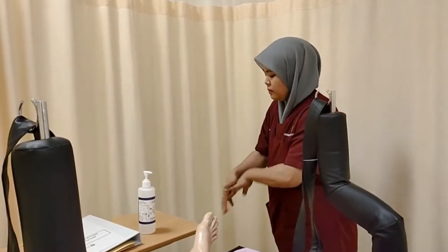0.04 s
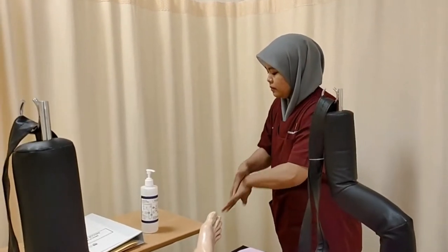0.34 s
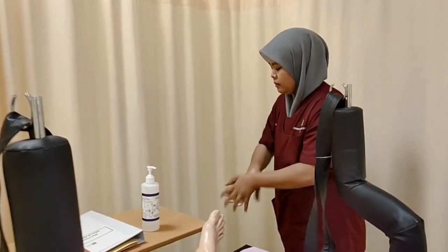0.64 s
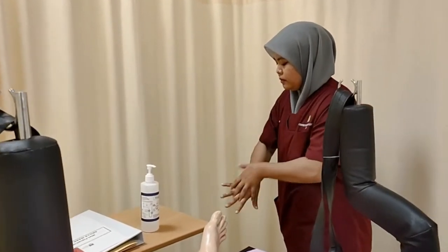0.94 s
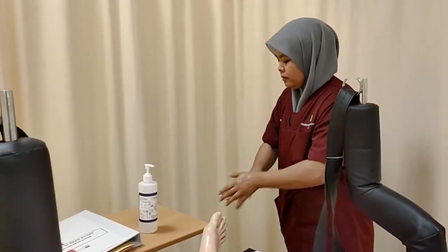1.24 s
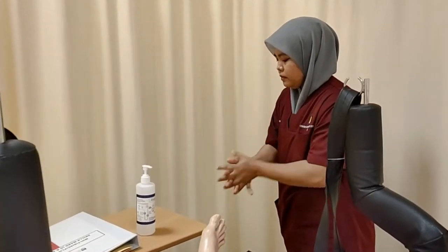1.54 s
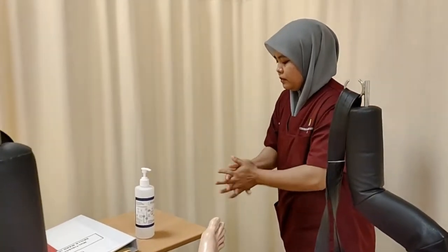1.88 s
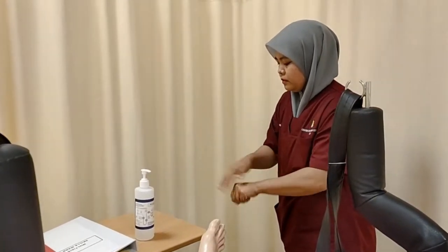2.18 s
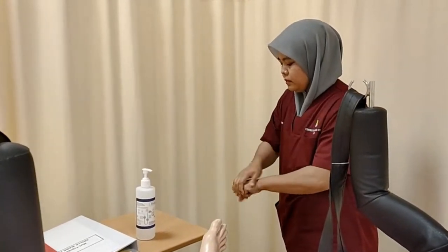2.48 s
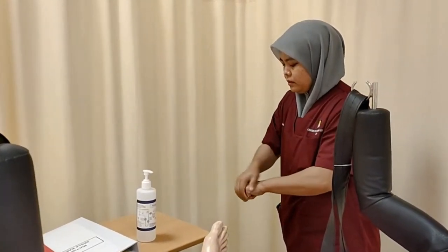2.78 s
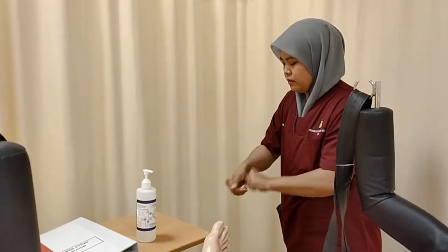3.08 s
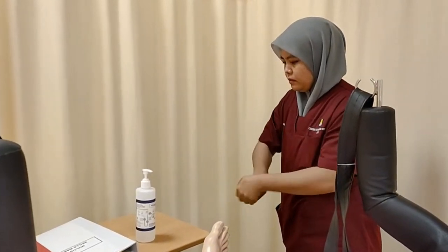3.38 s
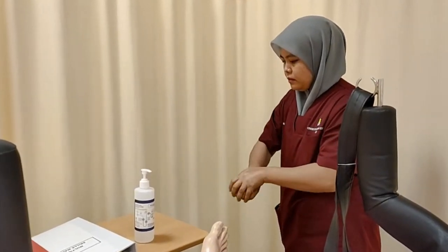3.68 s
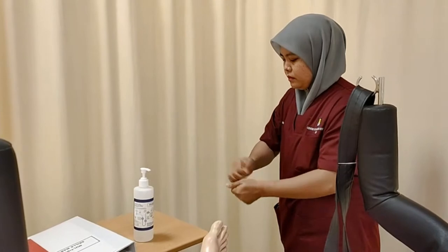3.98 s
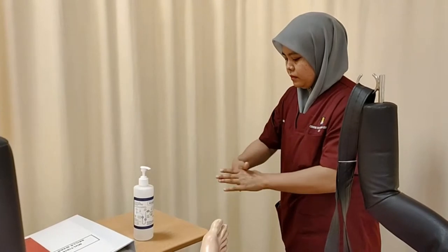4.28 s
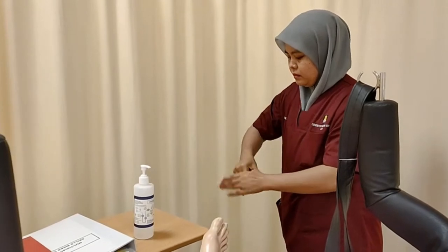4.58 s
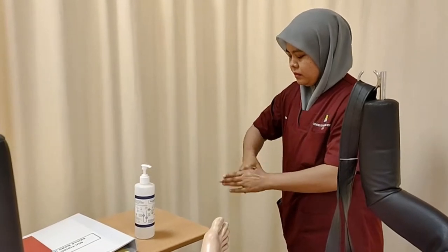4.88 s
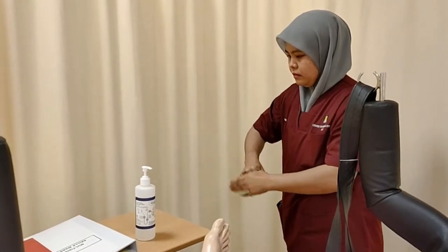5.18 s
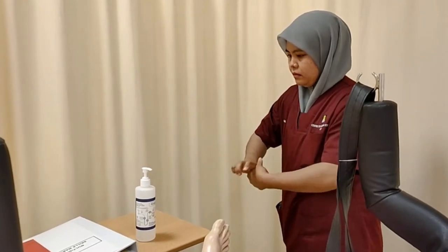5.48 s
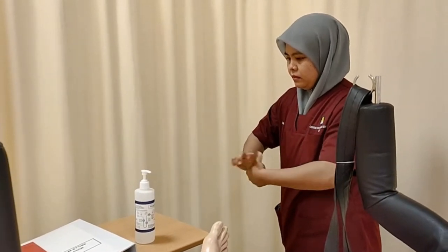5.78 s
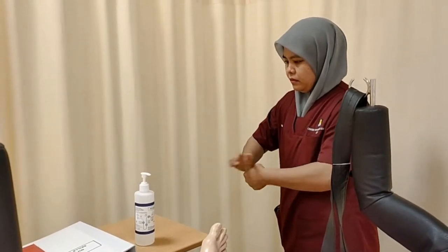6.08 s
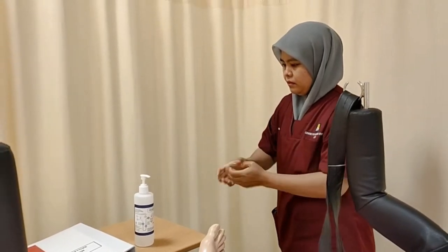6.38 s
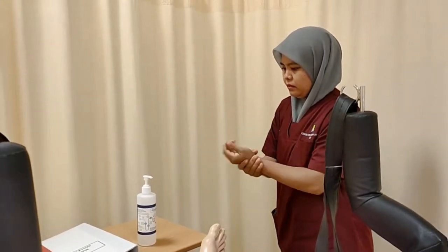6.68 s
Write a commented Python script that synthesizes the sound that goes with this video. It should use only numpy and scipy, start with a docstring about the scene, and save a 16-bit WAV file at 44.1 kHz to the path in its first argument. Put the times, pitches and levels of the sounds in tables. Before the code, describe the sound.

Quiet hand rubbing is heard in stereo in a small room with little echo. Brisk, hissy palm strokes come first, followed by softer, uneven rubbing and occasional tiny clicks of damp skin, one sharper near the middle. After a brief lull, a few more light strokes follow. A low ventilation rumble, a wavering hum and a thin hiss continue throughout, stronger than the hands.

```python
"""Hands rub together in a curtained room: brisk palm strokes first, softer wringing later.
Each stroke of skin on skin is a swell of tiny slips. Cupped palms squeeze out one puff of air,
and now and then damp skin parts with a tick. Air conditioning rumbles and hums throughout,
its vent hissing from the right, under a faint high hiss. Heard at two microphone ports."""
import sys
import numpy as np
from scipy import signal
from scipy.fft import rfft, irfft
from scipy.io import wavfile

SR = 44100
rng = np.random.default_rng(int(sys.argv[2]) if len(sys.argv) > 2 else 0)


def wrap_up_sound(samples):
    """Save the sound to the file named by the first command line argument, as 16-bit audio."""
    columns = np.atleast_2d(samples).T
    # keep every value between -1 and 1, then stretch to whole-number steps
    tamed = np.clip(columns, -1, 1)
    steps = np.round(tamed * 32767).astype(np.int16)
    wavfile.write(sys.argv[1], SR, steps)


N = 301551
TIME_S = np.arange(N) / SR
FREQ_HZ = np.maximum(np.arange(N // 2 + 1) * SR / N, 1)

# ventilation rumble: freq_hz, density_db_per_hz
RUMBLE_SPECTRUM = [(4, -72), (13, -44), (21, -49), (30, -47), (46, -55), (64, -58), (120, -58), (155, -65),
                   (230, -65.5), (370, -71), (520, -74.5), (850, -78.5), (1400, -81.5), (2200, -83.5),
                   (2650, -91.5), (4500, -112)]
# duct and room resonances: centre_hz, width_hz, lift_db
DUCT_MODES = [(49.7, 4.2, 7.5), (97.5, 4.7, -1), (140.8, 1.16, 7.5), (187.5, 24.7, 5.5), (274.3, 5.4, 2.5),
              (299.3, 14, 4), (438.3, 10.5, 4.5), (675, 61, 4.5), (791, 30, 7), (881, 13.5, 8),
              (1038, 6.7, 5.5)]
# direct vent hiss: freq_hz, density_db_per_hz
VENT_SPECTRUM = [(500, -100), (1000, -90), (1350, -88), (1800, -86.5), (2250, -83.5), (2450, -96),
                 (3000, -112)]
# blower hum, with brief dips and a late swell: time_s, level_db
HUM_LEVELS = [(0.0, -38.5), (0.6, -45), (0.78, -50), (1.0, -38.5), (1.6, -41.5), (2.1, -39.5), (2.3, -49),
              (2.6, -38.5), (3.1, -39.5), (4.2, -38), (4.9, -38), (5.15, -45.5), (5.65, -35), (6.25, -35.5),
              (6.5, -48.5), (6.84, -38.5)]
# faint high hiss: freq_hz, density_db_per_hz
HISS_SPECTRUM = [(4500, -118), (5400, -109), (6500, -106), (7700, -102), (9000, -106.5), (10200, -114),
                 (11500, -114), (12600, -116), (13200, -145)]
# sliding skin: freq_hz, gain_db
SKIN_SPECTRUM = [(1200, -28), (3200, -1), (4000, -5.5), (4550, -16), (5400, 1.5), (6100, 0.5), (7400, 8),
                 (8500, 4.5), (9600, -1.5), (10500, -8.5), (11700, -10), (13000, -11), (14200, -9),
                 (15500, -21)]
# light rubbing between strokes: time_s, level_db
CONTACT_LEVELS = [(0.0, -66), (0.4, -69), (0.7, -65), (2.3, -73.5), (3.1, -75), (4.3, -67.5), (4.8, -71),
                  (5.2, -69), (6.05, -70), (6.84, -66)]
# hand strokes: centre_s, level_db, half_length_s, brightness_db
HAND_STROKES = [(0.037, -55, 0.023, 4.0), (0.137, -55.5, 0.027, 0.5), (0.25, -55, 0.017, 5),
                (0.507, -57.5, 0.021, 0), (0.592, -55, 0.017, 2), (0.677, -48, 0.013, 1),
                (0.768, -55, 0.026, 2.5), (0.869, -46, 0.012, -3), (0.953, -54, 0.02, 2.5),
                (1.066, -46.5, 0.0087, -2), (1.188, -56, 0.02, 0), (1.262, -60, 0.019, 4),
                (1.328, -55.5, 0.029, 1), (1.415, -52, 0.019, -1), (1.51, -57, 0.02, -2),
                (1.607, -51, 0.015, -1), (1.722, -47, 0.014, -1), (1.807, -50, 0.021, -6),
                (1.933, -46.5, 0.01, -3), (1.995, -62, 0.022, 3), (2.078, -57, 0.011, -2),
                (2.229, -60.5, 0.011, -3), (2.283, -64, 0.015, -1), (2.394, -58.5, 0.016, 0),
                (2.486, -61.0, 0.007, -9), (2.55, -59.5, 0.02, -2), (2.63, -54.5, 0.017, -1),
                (2.742, -59, 0.013, -15), (2.783, -63, 0.017, 0), (2.87, -57.0, 0.031, 0.5),
                (2.936, -63, 0.023, -7), (2.995, -63, 0.018, 0.0), (3.082, -61, 0.022, 0),
                (3.157, -57, 0.0071, 2), (3.184, -54, 0.012, -6), (3.24, -59, 0.063, -1),
                (3.375, -53, 0.015, -3), (3.46, -58.5, 0.023, 0.0), (3.513, -59.5, 0.018, 0),
                (3.596, -53.5, 0.013, -3), (3.684, -63.5, 0.048, 0), (3.81, -60.5, 0.025, 1),
                (3.898, -56, 0.016, -2), (3.948, -63, 0.035, 3), (4.1, -65, 0.023, -1),
                (4.159, -58.5, 0.016, 4.5), (4.325, -62.0, 0.0091, 6), (4.61, -62, 0.034, 1),
                (5.337, -63, 0.01, -1.0), (5.402, -61, 0.04, 3.5), (5.544, -63.5, 0.031, 2),
                (5.631, -62, 0.013, 1), (5.698, -59, 0.018, 3.5), (5.84, -59, 0.016, 3),
                (5.92, -62, 0.032, 2), (6.188, -63, 0.03, 4), (6.27, -66, 0.031, 5),
                (6.404, -63, 0.038, -4), (6.483, -60, 0.035, -1), (6.574, -70, 0.029, -6),
                (6.652, -62, 0.028, 8), (6.71, -57, 0.024, 3), (6.758, -67, 0.021, 3.0),
                (6.82, -55, 0.036, 1)]
# air squeezed from cupped palms: start_s, pitch_hz, dry_peak_db, t60_s
PALM_PUFFS = [(1.422, 1290, -36.5, 0.066)]
# damp skin parting: start_s, dry_peak_db
SKIN_TICKS = [(2.149, -39), (2.3937, -47), (2.4856, -48), (2.6227, -44), (3.158, -39), (3.1692, -25.5),
              (3.66, -43), (6.469, -44)]
# modes of the hollow between the hands: pitch_hz, gain_db, t60_s
HOLLOW_MODES = [(1820, -6.5, .007), (2390, -8, 0.0046), (3550, -12.5, 0.0064), (5990, -1.5, 0.0039),
                (6570, 0.5, 0.005), (7300, -6, .006), (8600, -1.5, 0.0043), (13400, -14, .0015)]
# room field at the two ports: freq_hz, correlation
PORT_CORRELATION = [(40, 0.99), (64, 0.98), (85, 0.88), (130, 0.97), (290, 0.84), (600, 0.65), (800, 0.24),
                    (1050, 0.1), (1500, -0.49), (2200, 0.3), (3000, -0.023), (4200, -0.011), (5200, 0.13),
                    (6600, 0.21), (7900, 0.99), (8900, 0.8), (10300, 0.82), (12400, 0.93), (14000, 0.71)]
# port colouring: freq_hz, left_minus_right_db
PORT_BALANCE = [(55, -0.5), (66, -1.5), (80, -0.5), (300, 0), (700, -1.5), (1200, 1.5), (1900, 3.5),
                (2400, 2), (2900, -5), (3900, 0), (4800, -3.5), (5300, 4), (6100, 0), (7150, 3), (8500, -2),
                (10500, 0)]


def amp(db):
    """Decibels to gain."""
    return 10 ** (np.asarray(db) / 20)


def unit_rms(x):
    """Scale to rms 1."""
    return x / np.sqrt(np.mean(x ** 2))


def curve(points):
    """Interpolate (freq_hz, value) points over log frequency."""
    hz, value = np.transpose(points)
    return np.interp(np.log(FREQ_HZ), np.log(hz), value)


def colour(x, gain_db):
    """Minimum-phase filter."""
    cepstrum = irfft(gain_db * np.log(10) / 20, N)
    cepstrum[1:N // 2] *= 2
    cepstrum[N // 2:] = 0
    return irfft(rfft(x) * np.exp(rfft(cepstrum)), N)


def noise(density_db_per_hz):
    """Gaussian noise of the given spectrum."""
    return irfft(rfft(rng.standard_normal(N)) * amp(density_db_per_hz), N) * np.sqrt(SR / 2)


def drift(rate_hz):
    """Smooth random motion, rms 1."""
    return unit_rms(irfft(rfft(rng.standard_normal(N)) * np.exp(-(FREQ_HZ / rate_hz) ** 2), N))


def pan(left_minus_right_db):
    """Left and right gains."""
    return amp(np.array([[left_minus_right_db], [-left_minus_right_db]]) / 2)


def diffuse(a, b):
    """Two unrelated signals become one field reaching the ports from all sides."""
    correlation = np.clip(curve(PORT_CORRELATION), -.999, .999)
    mid = rfft(a) * np.sqrt((1 + correlation) / 2)
    side = rfft(b) * np.sqrt((1 - correlation) / 2)
    return irfft(np.array([mid + side, mid - side]), N)


def room(x, t60_s, wet_db):
    """Short reflections from curtains, table and walls."""
    age_s = TIME_S[:SR // 2]
    tails = rng.standard_normal((2, len(age_s))) * amp(-60 * age_s / t60_s) * (age_s > .002)
    tails /= np.sqrt(np.sum(tails ** 2, axis=1, keepdims=True))
    return amp(wet_db) * diffuse(*(signal.fftconvolve(x, tail)[:N] for tail in tails))


def rumble():
    """Turbulence rings the ducts and the room."""
    lift_db = sum(db / (1 + (2 * (FREQ_HZ - hz) / width_hz) ** 2) for hz, width_hz, db in DUCT_MODES)
    rolloff_db = 21 * np.log2(np.maximum(FREQ_HZ / 4500, 1))
    spectrum_db = curve(RUMBLE_SPECTRUM) + lift_db - rolloff_db
    return diffuse(noise(spectrum_db), noise(spectrum_db)) * amp(0.26 * drift(13))


def vent(lag_samples=17):
    """Air hisses from the vent and reaches the right port first."""
    rolloff_db = 24 * np.log2(np.maximum(FREQ_HZ / 3000, 1))
    air = noise(curve(VENT_SPECTRUM) - rolloff_db) * amp(2.3 * drift(26))
    return np.array([np.roll(air, lag_samples), air])


def blower(hum_hz=75, throb_hz=30.34):
    """The fan's tone wavers in pitch and level over a deep, uneven machinery throb."""
    hum = unit_rms(np.sin(2 * np.pi * np.cumsum(hum_hz + 0.3 * drift(1.4)) / SR))
    throb = unit_rms(np.sin(2 * np.pi * np.cumsum(throb_hz + 1.074 * drift(2.77)) / SR))
    hum_db = np.interp(TIME_S, *np.transpose(HUM_LEVELS)) + drift(6.3)
    throb_db = -38.5 + 4.5 * drift(3.9)
    return pan(-2) * amp(hum_db) * hum + amp(throb_db) * throb


def hiss():
    """A thin hiss flickers high above the rumble."""
    spectrum_db = curve(HISS_SPECTRUM)
    return diffuse(noise(spectrum_db), noise(spectrum_db)) * amp(1.3 * drift(31))


def slips(spread_db, spectrum):
    """Dense skin slips of unequal size, scattered to both ports by the curtains."""
    layers = []
    for _ in range(2):
        grains = rng.standard_normal(N) * amp(spread_db * np.minimum(rng.standard_normal(N), 2))
        layers.append(colour(grains, curve(spectrum)))
    return unit_rms(diffuse(*layers))


def crackle(low_hz=5500, high_hz=13500, decay_cycles=6.3, spread_db=18, count=3000):
    """Tiny bubbles in the moist film burst, each with its own pitch, size and place."""
    out, age_s = np.zeros((2, N)), TIME_S[:SR // 200]
    for when, pitch, size, place in rng.random((count, 4)):
        hz = low_hz + pitch * (high_hz - low_hz)
        start = int(when * (N - len(age_s)))
        pop = np.sin(2 * np.pi * hz * age_s) * np.exp(-hz * age_s / decay_cycles)
        out[:, start:start + len(age_s)] += pan(10 * (place - .5)) * amp(spread_db * size) * pop
    return unit_rms(out)


def stroke_powers(contact_brightness_db=-4, cup_share=0.36):
    """Low, mid and high band power: each stroke swells and dies with the hand's speed."""
    contact = amp(np.interp(TIME_S, *np.transpose(CONTACT_LEVELS)) + 3 * drift(7.4)) ** 2
    low, mid, high = contact.copy(), contact.copy(), contact * amp(contact_brightness_db) ** 2
    for centre_s, level_db, half_length_s, brightness_db in HAND_STROKES:
        distance = np.minimum(np.abs(TIME_S - centre_s) / half_length_s, 20)
        power = amp(level_db) ** 2 * np.exp(-distance ** 1.3)
        low += power * amp(-cup_share * brightness_db) ** 2  # duller, cupped strokes gain lows
        mid += power
        high += power * amp(brightness_db) ** 2
    return low, mid, high


def rubbing(low_hz=6550, high_hz=8900, sizzle_hz=12900, brisk_db=-58.5, flutter_db=1.6):
    """Skin ridges catch and slip; the changing cup of the hands tilts the colour."""
    low_power, mid_power, high_power = stroke_powers()
    effort = np.sqrt(mid_power / mid_power.max())
    rasp = slips(spread_db=10, spectrum=[(900, -7), (3200, -22), (4500, 7), (6000, -4), (14000, -10)])
    skin = slips(spread_db=3.5, spectrum=SKIN_SPECTRUM)
    skin += effort * (amp(-17) * rasp + amp(-8) * crackle())
    low = irfft(rfft(skin) / (1 + (FREQ_HZ / low_hz) ** 20), N)
    high = irfft(rfft(skin) / (1 + (high_hz / FREQ_HZ) ** 20), N)
    mid = skin - low - high
    sizzle = irfft(rfft(high) / (1 + (sizzle_hz / FREQ_HZ) ** 60), N)
    gentleness = 1 / (1 + (high_power / amp(brisk_db) ** 2) ** 2)
    high -= gentleness * sizzle  # only brisk strokes keep the sizzle
    out = np.sqrt(low_power) * amp(3 * drift(26)) * low
    out += np.sqrt(mid_power) * mid
    out += np.sqrt(high_power) * amp(2.5 * drift(45)) * high
    out *= amp(-0.36 + flutter_db * drift(110))
    return out + room(out.mean(axis=0), t60_s=0.063, wet_db=-5)


def puff(half_width_hz=230):
    """The hollow between the palms rings briefly as it closes."""
    out = np.zeros(N)
    for start_s, pitch_hz, peak_db, t60_s in PALM_PUFFS:
        age_s = TIME_S - start_s
        push = rng.standard_normal(N) * (age_s > 0) * amp(-60 * np.abs(age_s) / t60_s)
        resonance_db = -20 * np.log10(1 + ((FREQ_HZ - pitch_hz) / half_width_hz) ** 2)
        ring = colour(push, resonance_db)
        out += amp(peak_db) * ring / np.abs(ring).max()
    return out + room(out, t60_s=0.12, wet_db=-1)


def ticks(attack_s=0.00039):
    """A moist film snaps and rings the hollow between the hands for a few milliseconds."""
    out, age_s = np.zeros(N), TIME_S[:SR // 20]
    ring = sum(amp(db - 60 * age_s / t60_s) * np.sin(2 * np.pi * hz * age_s)
               for hz, db, t60_s in HOLLOW_MODES)
    snap = ring * (1 - np.exp(-age_s / attack_s))
    for start_s, peak_db in SKIN_TICKS:
        start = int(start_s * SR)
        out[start:start + len(age_s)] += amp(peak_db) * snap / np.abs(snap).max()
    return out + room(out, t60_s=0.14, wet_db=-2.5)


def scene():
    """Hands over steady air conditioning."""
    return rumble() + vent() + blower() + hiss() + rubbing() + puff() + ticks()


def record(dry):
    """Each port tints the sound; a low-pass cuts the top."""
    tint_db = curve(PORT_BALANCE) / 2
    tinted = irfft(rfft(dry) * amp([tint_db, -tint_db]), N)
    cutoff_hz = 15300
    return signal.sosfilt(signal.ellip(8, .2, 70, cutoff_hz, fs=SR, output="sos"), tinted)


dry = scene()
out = record(dry)
wrap_up_sound(out)
```